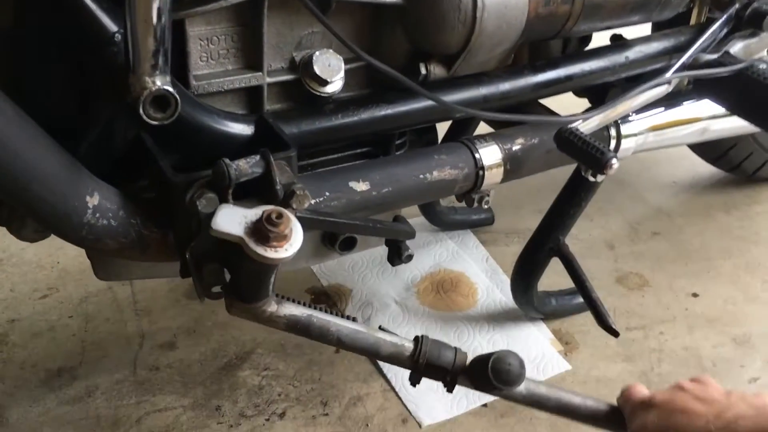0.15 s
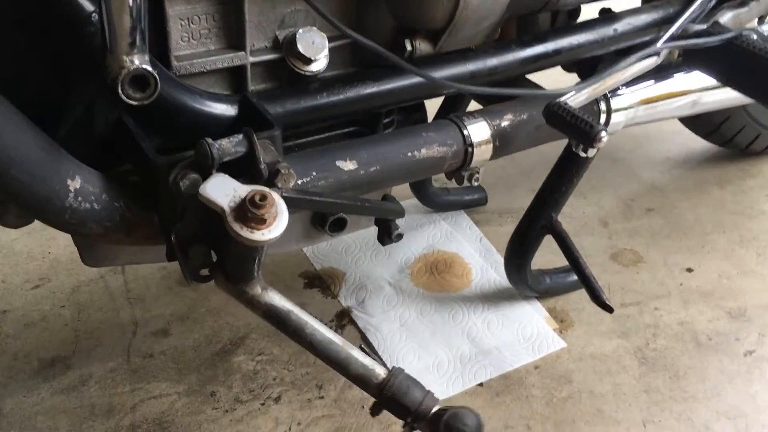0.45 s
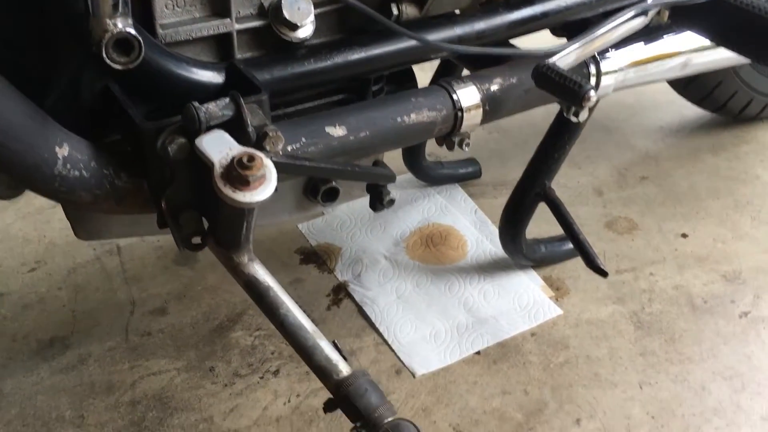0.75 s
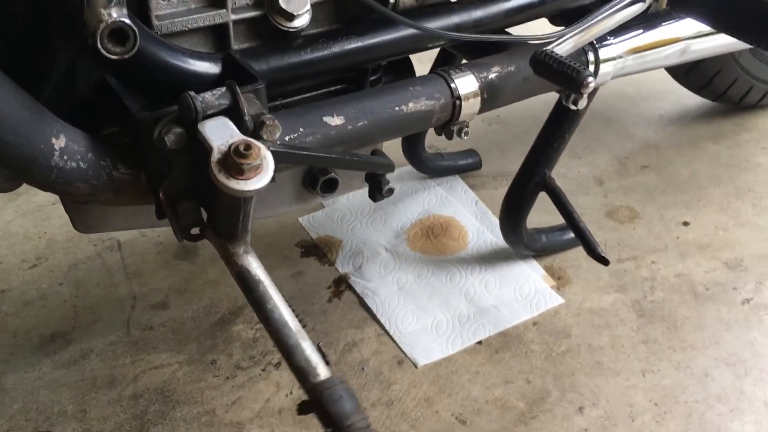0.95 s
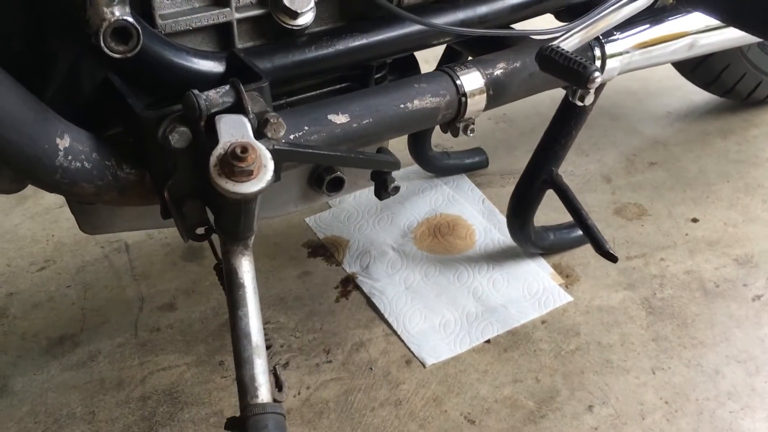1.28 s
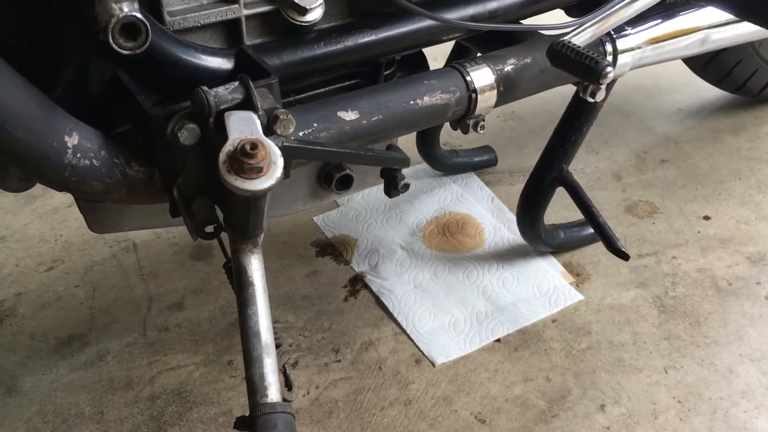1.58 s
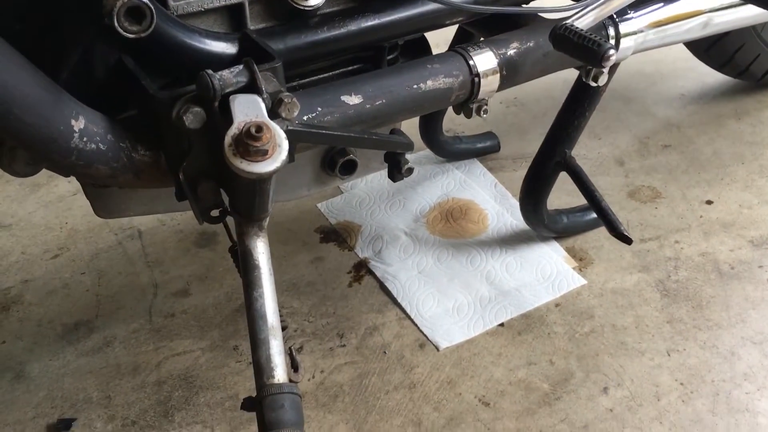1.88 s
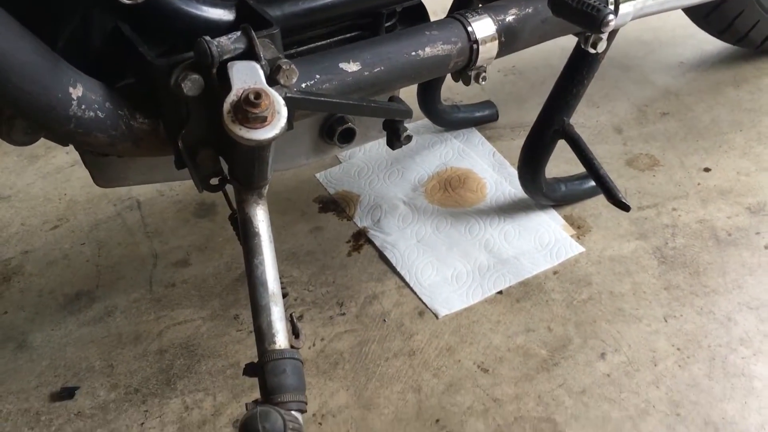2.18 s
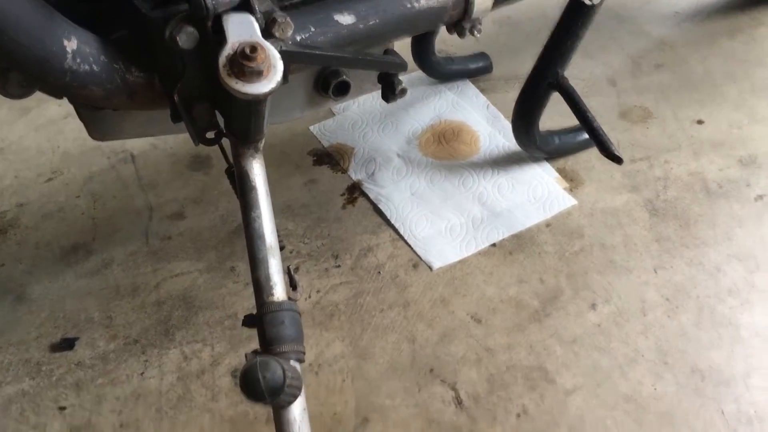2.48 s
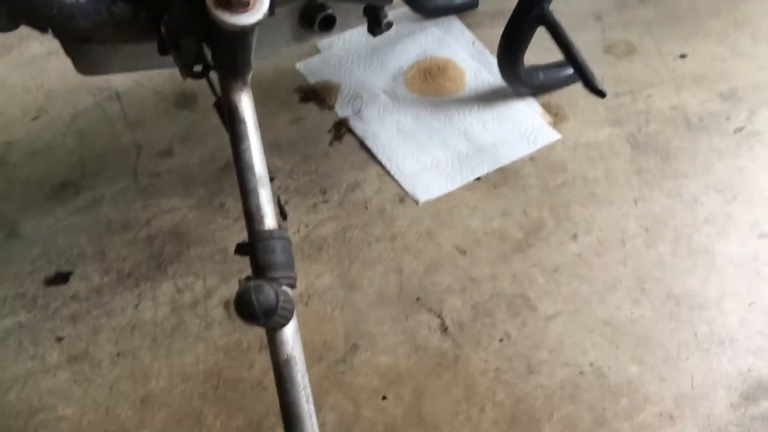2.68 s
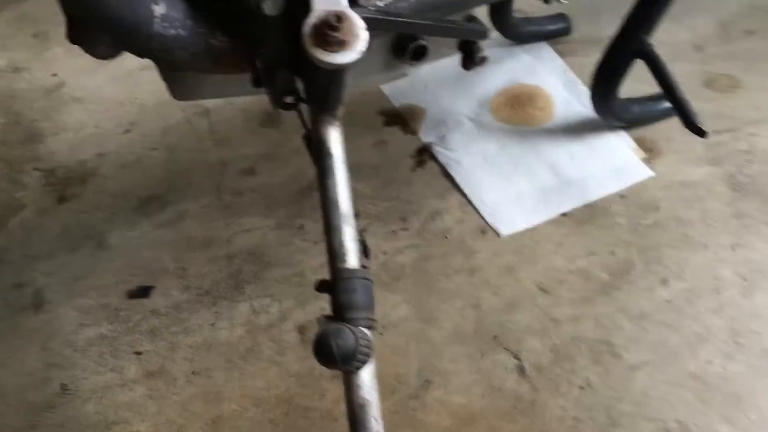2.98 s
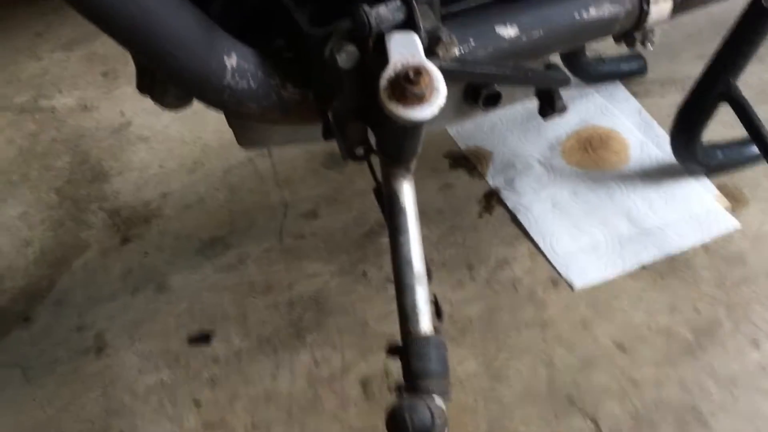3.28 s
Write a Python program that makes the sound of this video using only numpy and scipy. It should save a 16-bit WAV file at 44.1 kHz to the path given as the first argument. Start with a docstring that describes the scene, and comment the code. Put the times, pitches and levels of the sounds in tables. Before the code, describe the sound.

Close to the microphone in a hard-walled garage, a low hum runs throughout; a steel stand scrapes and creaks, snaps loudly into place, buzzes and ticks briefly, then faint rustling and near quiet.

```python
"""A concrete garage: a steel side stand swings out, over a low machine hum, room rumble and hiss.
Its pivot sticks and slips, sending gritty noise into the arm's modes; the frame groans and creaks.
A throbbing tone squeals briefly and the arm clacks onto its stop in a cluster of rings and cracks.
The frame booms, loose parts buzz and a spring ticks; decaying noise makes the walls' answer.
A soft noise shuffle follows, then faint noise chirps and one dry pulse tick."""
import sys
import numpy as np
from scipy import signal
from scipy.fft import rfft, irfft, next_fast_len
from scipy.io import wavfile
from scipy.ndimage import map_coordinates

SR = 44100
rng = np.random.default_rng(int(sys.argv[2]) if len(sys.argv) > 2 else 0)


def master_out(mix):
    """Clip the mix to full scale and print it as 16-bit PCM to the path in sys.argv[1]."""
    frames = np.transpose(np.atleast_2d(mix))
    ceiling = np.clip(frames, -1, 1)
    pcm = np.round(ceiling * 32767).astype(np.int16)
    wavfile.write(sys.argv[1], SR, pcm)


def natural_amplitude(level_db):
    """Convert a level in decibels to a linear amplitude factor, elementwise."""
    exponent = np.asarray(level_db, float) / 20
    return 10 ** exponent


N = 152145
T = np.arange(N) / SR  # seconds
# modes of the arm's stop, before each use scales them: pitch_hz, relative_db, t60_s
STOP_MODES = [(998.7, -7, 0.1303), (1489.4, -3.5, 0.079), (1609.3, -7, 0.14), (1851.7, -7.5, .08),
              (2310, -9, 0.14), (2911, -9, .1), (3472, -8.5, .1), (4070, -9, 0.026), (5300, -6, 0.049),
              (6085, -7.5, .07), (6913, -8.5, .12), (8350, -2.5, .07), (9437, -3.5, 0.082),
              (10520, -16.5, .06), (13060, -18, .04)]


def unit(x):
    """Scale to rms 1."""
    return x / np.sqrt(np.mean(x ** 2) + 1e-20)


def along(points, hz):
    """Read a (Hz, value) curve on a log frequency axis."""
    f, v = np.transpose(points)
    return np.interp(np.log(hz + 1), np.log(f + 1), v)


def level(rows, column=1):
    """Gain along a (s, dB, ..) curve, silent outside."""
    rows = np.transpose(rows)
    return natural_amplitude(np.interp(T, rows[0], rows[column], left=-150, right=-150))


def wobble(rate):
    """A smooth random curve, rate knots a second."""
    knots = rng.standard_normal(int(N * rate / SR) + 4)
    return map_coordinates(knots, [T * rate])


def filtered(x, response):
    """Pass x through a complex response of frequency."""
    m = next_fast_len(N + SR // 2)
    return irfft(rfft(x, m) * response(np.fft.rfftfreq(m, 1 / SR)), m)[..., :N]


def rings(peaks):
    """Causal sum of (Hz, width Hz, dB) resonances with alternating signs."""
    def response(f):
        return sum((-1) ** k * natural_amplitude(db) * 1j * f * w / (c * c - f * f + 1j * f * w)
                   for k, (c, w, db) in enumerate(peaks))
    return response


def noise(spectrum):
    """Noise of rms 1, coloured by a (Hz, relative dB) curve."""
    return unit(filtered(rng.standard_normal(N), lambda hz: natural_amplitude(along(spectrum, hz))))


def decay(s, t60, rise):
    """Envelope from s: exponential onset with time constant rise, then a fall of 60 dB in t60."""
    t = np.maximum(T - s, 0)
    return (1 - np.exp(-t / rise)) * natural_amplitude(-60 * t / t60)


def machine_hum():
    """A low tone of wandering pitch and level, with a weak octave."""
    # course of the hum: start_s, pitch_hz, level_db (before the waver)
    hum_course = [(0.0, 80.35, -34.5), (0.06, 80.63, -35.5), (0.178, 81.34, -31), (0.57, 82.73, -28.5),
                  (1.448, 81.99, -29), (1.48, 82.28, -28), (1.74, 81.44, -30.5), (1.76, 80.74, -36.5),
                  (1.79, 80.85, -27.5), (1.862, 82.11, -32.5), (1.99, 79.84, -31), (2.0, 81.65, -33),
                  (2.21, 81.27, -29.5), (2.28, 82.04, -32.5), (2.419, 81.6, -29), (2.91, 81.23, -29),
                  (3.23, 81.3, -32.5), (3.45, 81.39, -32)]
    waver_db, octave_db = 0.6159, -31
    s, hz, db = np.transpose(hum_course)
    turn = 2 * np.pi * np.cumsum(np.interp(T, s, hz)) / SR
    gain = np.sqrt(2) * natural_amplitude(np.interp(T, s, db) + waver_db * wobble(14))
    return gain * (np.sin(turn) + natural_amplitude(octave_db) * np.sin(2 * turn))


def room_rumble():
    """Low coloured noise whose level wavers."""
    # rumble colour: pitch_hz, relative_db
    rumble_colour = [(15, -42), (22, -14.5), (35, 6), (50, 1), (62, 0.5), (82, -0.5), (100, 0), (128, 6),
                     (145, -5), (165, -4), (200, -19), (260, -47.5)]
    silent_above = [(400, -120)]
    return natural_amplitude(-45.5 + .8 * wobble(9.5)) * noise(rumble_colour + silent_above)


def room_hiss():
    """Steady coloured noise of the room's air."""
    # hiss colour: pitch_hz, relative_db
    air_colour = [(150, -30), (200, -3), (250, 0), (310, -7), (500, -14), (1000, -17), (2000, -22),
                  (4000, -26), (5000, -30), (6300, -31), (8000, -34), (10000, -36), (15900, -39)]
    return natural_amplitude(-63) * noise(air_colour)


def frame_groan():
    """Noise filtered twice by one resonance: the frame groans under the drag."""
    # course of the groan: start_s, level_db
    groan_course = [(0.42, -70.5), (0.582, -44), (0.682, -51.5), (0.764, -65.5), (0.988, -78.5),
                    (1.012, -63.5), (1.064, -62), (1.146, -44), (1.186, -48), (1.22, -40.5)]
    resonance = rings([(384.3, 75, 0)])  # Hz, width Hz of a single pass, dB
    return level(groan_course) * unit(filtered(rng.standard_normal(N), lambda f: resonance(f) ** 2))


def pivot():
    """Stick-slip: each slip opens with a tick and drives gritty noise into the arm's modes."""
    # onset of each slip: start_s
    slip_starts = [.54, .578, .607, .783, .8735, .992, 1.101, 1.121, 1.176]
    # each slip: rise_s, hold_s, fall_t60_s, level_db (before tone shaping and jolt),
    # brightness_db_per_octave, tick_db, favoured_pitch_hz
    slips = [(.03, .015, 0.082, -49.5, -5.5, -82.5, 1637), (.015, 0.066, 0.17, -40.5, -2, -62, 4800),
             (0.02, 0.025, 0.22, -40, 0.5, -70.5, 2800), (0.0026, 0.022, 0.31, -51, -7.5, -66.5, 1430),
             (0.0016, 0.013, 0.13, -49.5, -6, -46.5, 1430), (.006, 0.035, 0.1, -45, -4.5, -68, 3250),
             (0.005, 0.023, 0.14, -46, -5.5, -64, 1050), (0.0034, 0.0087, .1, -48, 1, -53.5, 7200),
             (0.02, 0.034, 0.11, -41.5, -2.43, -61.5, 1800)]
    # modes of the arm: pitch_hz
    arm_hz = [870, 969, 1281, 1430, 1884, 2112, 2519, 2856, 2982, 3200, 3558, 3710, 4110, 4410, 4730, 5044,
              5200, 5500, 5960, 6520, 7120, 7885, 8700, 9300, 11700]
    # the same modes: width_hz, relative_db (before each slip's scatter and favour)
    arm_rings = [(10.036, -15), (10.025, -11.5), (14, -10.5), (29.4, -3.5), (12, -8), (10, 2), (9.8, -6),
                 (30, -4), (19.911, -7.5), (15.94, -5), (9.95, -10), (16, -11), (30.5, -2), (19.883, -2),
                 (14, -4.5), (20, -10), (35, -9), (9.954, -5), (30, -12), (60, -15), (60, -20), (80, -21),
                 (150, -25), (150, -25), (300, -32)]
    # scrape noise between the rings: pitch_hz, relative_db
    broad_colour = [(150, -47.5), (250, -15), (393, -9), (684, -18.5), (1420, -5.5), (1810, -14.5),
                    (2080, -3), (3500, -2.5), (4090, -5), (15800, -38)]
    broad_db, grains_per_s, grain_spread_db = -3, 3100, 1
    favour_db, favour_octaves, scatter_db = 6.5, 0.13, 2.5
    sudden_s, jolt_db, jolt_t60_s = .007, 2.5, .02  # slips rising faster than sudden_s get a jolt
    tick_t60_s = 0.036

    out = np.zeros(N)
    grain_db = grain_spread_db * wobble(grains_per_s) + 2.1 * wobble(90)
    grit = rng.standard_normal(N) * natural_amplitude(grain_db)
    modes = [(c, w, g) for c, (w, g) in zip(arm_hz, arm_rings)]
    broad = lambda f: natural_amplitude(along(broad_colour, f))
    # both paths are levelled on steady grit
    ring_gain = np.std(filtered(grit, rings(modes)))
    broad_gain = np.std(filtered(grit, broad))
    tick = noise([(500, -23.0), (1500, 1.5), (6000, -1.5), (15900, -15.0)])
    # every slip grips the arm differently
    grips = scatter_db * rng.standard_normal((len(slips), len(modes)))
    for s, slip, grip in zip(slip_starts, slips, grips):
        rise, hold, t60, db, tilt_db, tick_db, hz = slip
        gripped = []
        for (c, w, g), d in zip(modes, grip):
            nearness = np.exp(-(np.log2(c / hz) / favour_octaves) ** 2)
            gripped.append((c, w, g + d + favour_db * nearness))
        arm = rings(gripped)

        def response(f):
            tilt = natural_amplitude(tilt_db * np.log2((f + 50) / 2000))
            return (arm(f) / ring_gain + natural_amplitude(broad_db) * broad(f) / broad_gain) * tilt

        fall = natural_amplitude(-60 * np.maximum(T - s - rise - hold, 0) / t60)
        push = np.clip((T - s) / rise, 0, 1) ** 2 * fall
        if rise < sudden_s:
            push = push + natural_amplitude(jolt_db) * decay(s + rise / 2, jolt_t60_s, .0005)
        out += natural_amplitude(db) * filtered(grit * push, response)
        out += natural_amplitude(tick_db) * decay(s, tick_t60_s, .0003) * tick
    return out


def garage(x):
    """The walls' answer, 300 samples late: each frequency of a noise tail dies at its own speed."""
    # decay of the concrete walls: pitch_hz, t60_s
    walls = [(200, 0.71), (1000, 0.48), (5000, 0.33), (12000, 0.074)]
    hz, t, z = signal.stft(rng.standard_normal(SR), SR, nperseg=256)
    fading = z * natural_amplitude(-60 * t / along(walls, hz)[:, None])
    tail = signal.istft(fading, SR, nperseg=256)[1]
    return signal.fftconvolve(np.pad(x, (300, 0)), tail / np.linalg.norm(tail))[:N]


def creaks():
    """Short low tones sliding down as the frame unloads."""
    # each creak: start_s, level_db (before the waver and decay)
    creak_starts = [(.995, -51.5), (1.118, -45)]
    from_hz, to_hz, sag_s, t60_s = 540, 336.4, .022, 0.5
    out = np.zeros(N)
    for s, db in creak_starts:
        hz = to_hz + (from_hz - to_hz) * np.exp(-np.maximum(T - s, 0) / sag_s)
        tone = np.sin(2 * np.pi * np.cumsum(hz) / SR)
        out += natural_amplitude(db + 1.8 * wobble(90)) * decay(s, t60_s, .008) * tone
    return out


def squeal():
    """A throbbing, drifting tone with rough noise overtones as the arm nears its stop."""
    # course of the squeal: start_s, tone_db (before the throb), overtones_over_tone_db
    squeal_course = [(1.18, -56.5, -3), (1.2, -38, -15), (1.212, -22.5, -5.5), (1.232, -24, 5)]
    # rough overtones: pitch_hz, width_hz, relative_db
    overtones = [(5500, 370, 2), (5874, 180, -13.5), (7870, 370, -11), (8417, 300, -0.5), (11500, 320, -15)]
    tone_hz, drift_hz = 2800, 40
    throb_hz, throb_peak_s, throb_depth = 167, 0.999, 0.32
    drift = np.cumsum(drift_hz * wobble(200)) / SR
    tone = np.sqrt(2) * np.sin(2 * np.pi * (tone_hz * T + drift))
    throb = 1 + throb_depth * np.cos(2 * np.pi * throb_hz * (T - throb_peak_s))
    rough = unit(filtered(rng.standard_normal(N), rings(overtones)))
    return level(squeal_course) * throb * (tone + level(squeal_course, column=2) * rough)


def stop_blows():
    """The arm lands in a cluster of blows: each rings the stop's modes under a noise crack."""
    # blows of the arm: start_s, level_db (before the ring and crack offsets)
    blows = [(1.2242, -24), (1.227, -21.5), (1.2301, -19.5), (1.2332, -11.5), (1.2351, -10), (1.2388, -16),
             (1.243, -18), (1.243, -18.5), (1.254, -24.5)]
    # colour of the crack: pitch_hz, relative_db
    crack_colour = [(180, -49.5), (300, -14.5), (640, -8), (790, -30), (1000, -11.5), (1700, -1.5),
                    (2900, -13), (4000, -2.5), (4800, -11), (6500, -12), (8580, -13.5), (15800, -30.5)]
    ring_db, crack_db, crack_t60_s, scatter_db = -15.5, 2, 0.015, 5.6
    out, crack, t = np.zeros(N), noise(crack_colour), T[:SR // 2]
    for s, db in blows:
        ring = sum(natural_amplitude(g + rng.normal(0, scatter_db) - 60 * t / t60) * np.sin(2 * np.pi * hz * t)
                   for hz, g, t60 in STOP_MODES)
        out[round(s * SR):][:len(t)] += natural_amplitude(db + ring_db) * ring
        out += natural_amplitude(db + crack_db) * crack * decay(s, crack_t60_s, 0.0003)
    return out


def frame_boom():
    """A decaying noise shudder rings the frame's resonances."""
    # frame resonances: pitch_hz, width_hz, relative_db
    frame_modes = [(214, 30, -8), (235, 25, -6), (337.5, 15, 1.5), (357, 12, 1), (447, 22, -3.5),
                   (569, 18, -4.5), (672, 22, -8), (1078, 25, -10)]
    start_s, t60_s, rise_s, boom_db = 1.238, 0.33, .008, -22
    shudder, frame = rng.standard_normal(N), rings(frame_modes)
    boom = filtered(shudder * decay(start_s, t60_s, rise_s), frame)
    return natural_amplitude(boom_db) * boom / np.std(filtered(shudder, frame))


def after_rings():
    """Thin wavering sines ring on after the blow, then are choked."""
    # after-rings: pitch_hz, level_db (before waver and decay), t60_s (until choked)
    long_rings = [(595, -53, 3), (2290, -66, 3)]
    start_s, rise_s, choked_s, choke_t60_s = 1.238, .008, 1.63, .15
    out = np.zeros(N)
    for hz, db, t60 in long_rings:
        gain = natural_amplitude(db + 2.5 * wobble(21.996)) * decay(start_s, t60, rise_s)
        out += gain * np.sin(2 * np.pi * hz * T)
    return out * natural_amplitude(-60 * np.maximum(T - choked_s, 0) / choke_t60_s)


def loose_parts():
    """Loose parts buzz after the blow: flickering noise, partly ringing in the stop's modes."""
    # course of the buzz: start_s, level_db (before the flicker and the mix)
    shake_course = [(1.245, -41.5), (1.255, -28), (1.29, -39), (1.34, -42), (1.355, -48.5), (1.43, -50),
                    (1.445, -65.5), (1.5, -63)]
    # colour of the buzz: pitch_hz, relative_db
    shake_colour = [(500, -25), (800, -19), (1000, -2.5), (1600, -0.5), (3000, -4), (4000, -4),
                    (6000, -9.5), (8500, -9), (11000, -15.5), (15900, -22)]
    ring_db = -4
    # a resonance of this width dies by 60 dB in t60
    modes = [(hz, np.log(1000) / (np.pi * t60), g) for hz, g, t60 in STOP_MODES]
    ringing = unit(filtered(rng.standard_normal(N), rings(modes)))
    flicker = natural_amplitude(-5.5 + 6.4 * wobble(120))
    return level(shake_course) * flicker * (noise(shake_colour) + natural_amplitude(ring_db) * ringing)


def spring_ticks():
    """The spring ticks: short decaying bursts of one coloured noise."""
    # ticks of the spring: start_s, level_db (before the decay)
    ticks = [(1.372, -38), (1.39, -40), (1.409, -38), (1.434, -48)]
    # colour of the ticks: pitch_hz, relative_db
    tick_colour = [(3000, -30), (4500, -8), (5800, 0), (7000, -4), (8200, -20), (15900, -28)]
    t60_s = .035
    return noise(tick_colour) * sum(natural_amplitude(db) * decay(s, t60_s, .001) for s, db in ticks)


def shuffle():
    """A soft shuffle after the clack: three noise bands that swell and fade apart."""
    # course of the shuffle, before the waver: start_s, low_db, middle_db, treble_db
    rustle_course = [(1.42, -58, -78, -89.5), (1.46, -49.5, -70, -69), (1.56, -54.5, -63, -66.5),
                     (1.635, -59, -65, -66.5), (1.65, -65.5, -69, -75), (1.7, -69.5, -68, -91),
                     (1.712, -50, -62, -76), (1.77, -54, -62, -85), (1.8, -59, -64, -85),
                     (1.84, -49.5, -66.5, -94.5), (1.875, -53.5, -70, -90), (1.9, -61, -67.5, -92),
                     (1.95, -57.5, -69, -99), (1.97, -63, -79, -100), (2.05, -64.5, -99, -95),
                     (2.15, -68.5, -94, -86.5)]
    # colours of the low, middle and treble bands, each: pitch_hz, relative_db
    rustle_colours = [
        [(150, -25), (200, -2), (300, 4), (450, -11.5), (700, -14.5), (900, -40.5)],
        [(600, -17), (800, 0), (2200, -3), (4200, -5.5), (6800, -14.5), (8500, -33.5)],
        [(4000, -13), (5000, 1), (8000, -1.5), (15900, -13.5)],
    ]
    bands = sum(level(rustle_course, column=k + 1) * noise(c) for k, c in enumerate(rustle_colours))
    return natural_amplitude(1.8 * wobble(35)) * bands


def faint_chirps():
    """Faint far chirps: narrow noise under bell-shaped swells."""
    # each chirp: centre_s, half_length_s, pitch_hz, level_db (at the top of the swell)
    chirps = [(3.149, 0.014, 3453, -69), (3.294, 0.033, 3403, -74)]
    width_hz = 400
    out = np.zeros(N)
    for s, half, centre_hz, db in chirps:
        band = filtered(rng.standard_normal(N), lambda f: np.exp(-((f - centre_hz) / width_hz) ** 2))
        out += natural_amplitude(db) * np.exp(-((T - s) / half) ** 2) * unit(band)
    return out


def dry_tick():
    """One tick without echo: a bare one-sided pulse."""
    start_s, t60_s, tick_db = 3.1733, .015, -37.5
    return natural_amplitude(tick_db) * decay(start_s, t60_s, .00003)


def scene():
    """The stand with the walls' answer, the small sounds and the background, as one channel."""
    drag = frame_groan() + pivot() + creaks() + squeal()
    clack = stop_blows() + frame_boom() + after_rings() + loose_parts() + spring_ticks()
    stand = drag + clack
    walls_db = -12
    background = machine_hum() + room_rumble() + room_hiss()
    small_sounds = shuffle() + faint_chirps() + dry_tick()
    return (stand + natural_amplitude(walls_db) * garage(stand) + small_sounds + background)[None]


def band_limit(x):
    """A steep low-pass at the top of the band."""
    return signal.sosfilt(signal.butter(12, 16000, fs=SR, output="sos"), x)


def record(dry):
    """The microphone signal: the loudest peaks bend softly towards a ceiling."""
    ceiling = .9  # of full scale
    mix = dry / (1 + np.abs(dry / ceiling) ** 4) ** (1 / 4)
    return band_limit(mix)


dry = scene()
out = record(dry)
master_out(out)
```